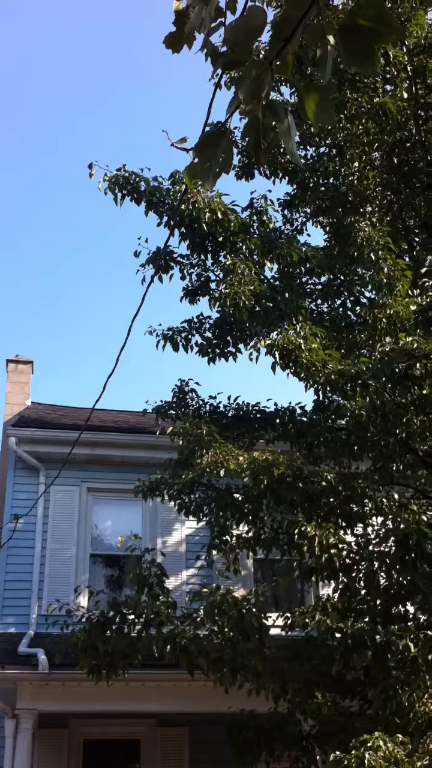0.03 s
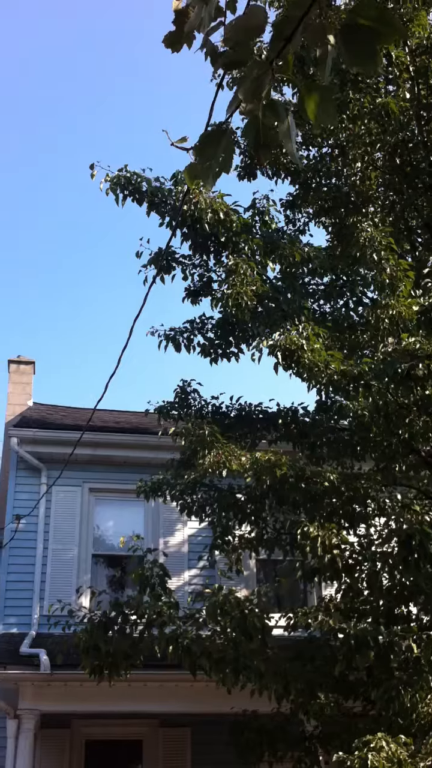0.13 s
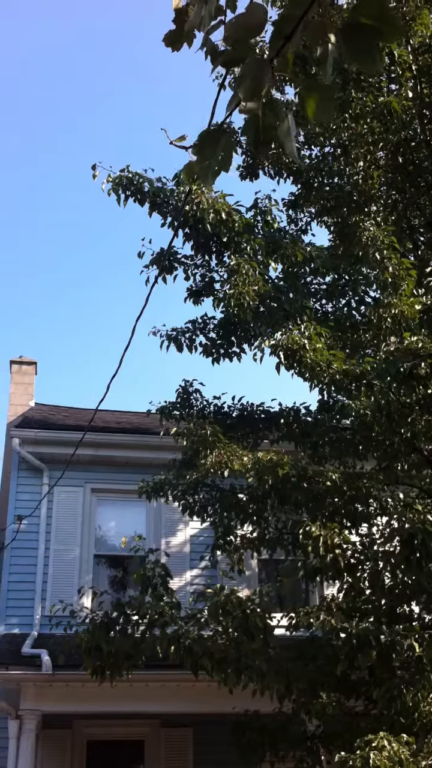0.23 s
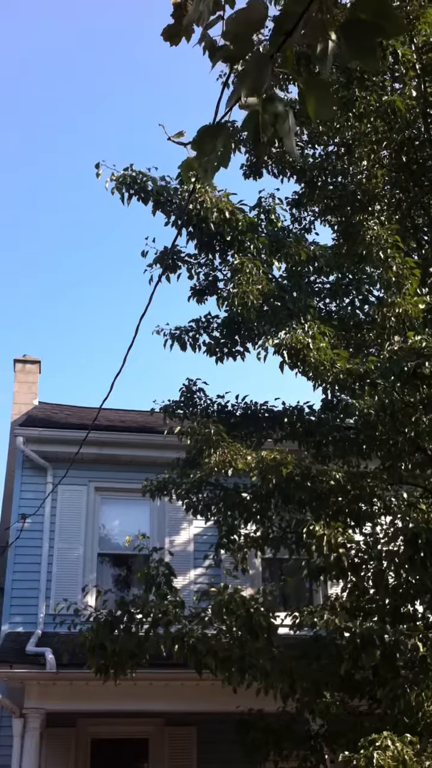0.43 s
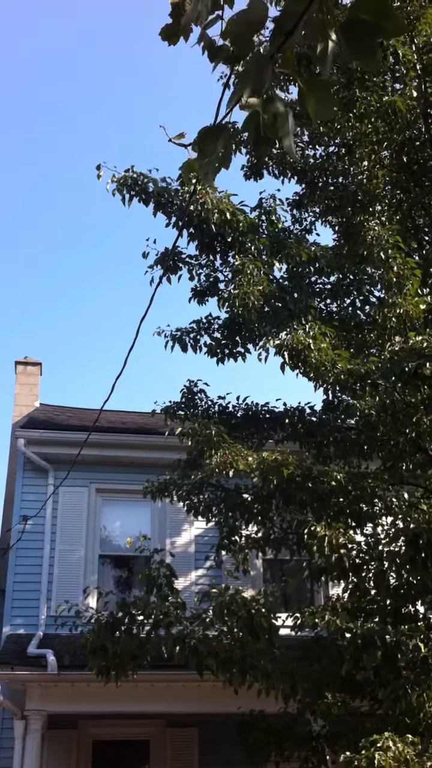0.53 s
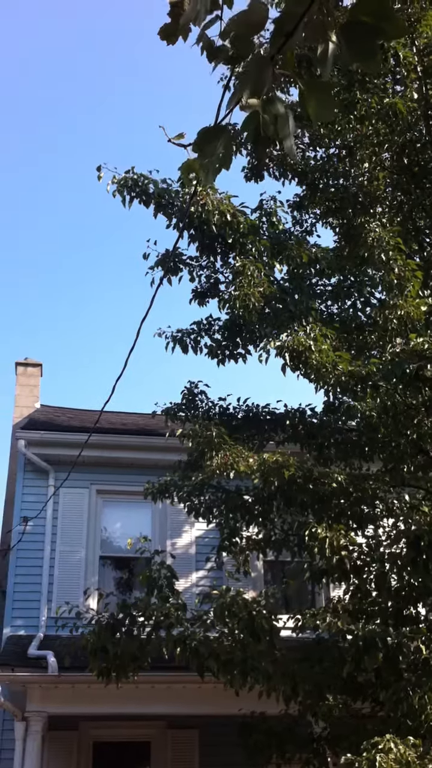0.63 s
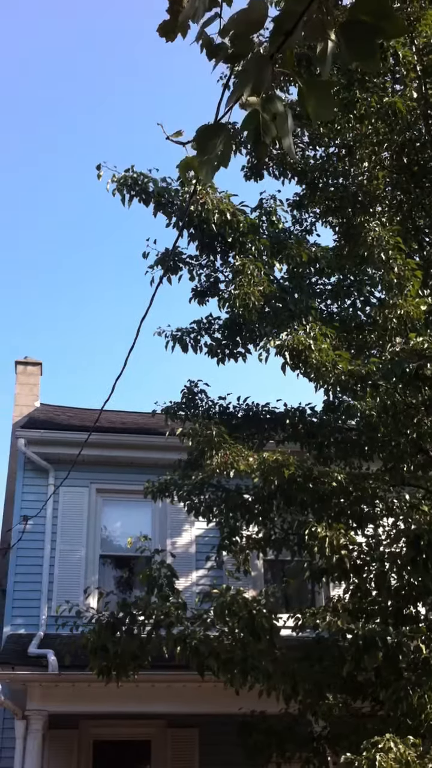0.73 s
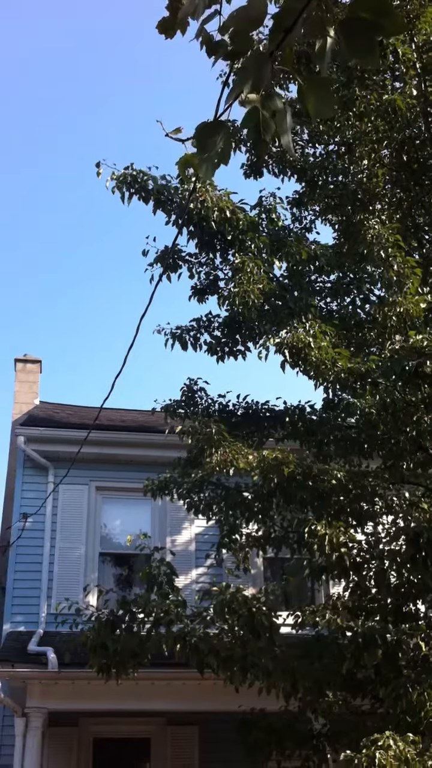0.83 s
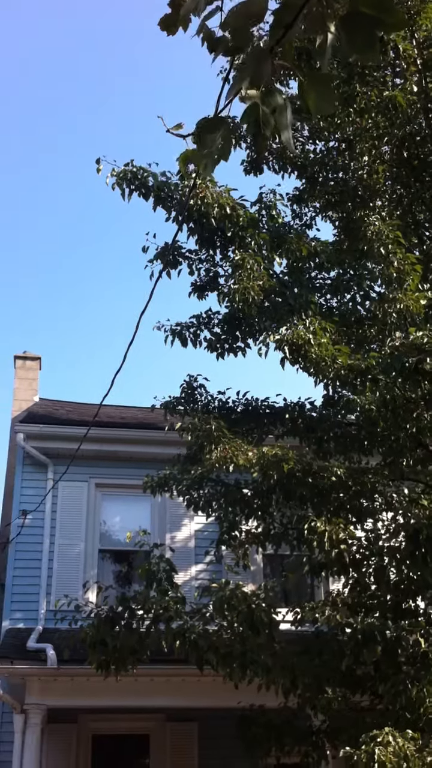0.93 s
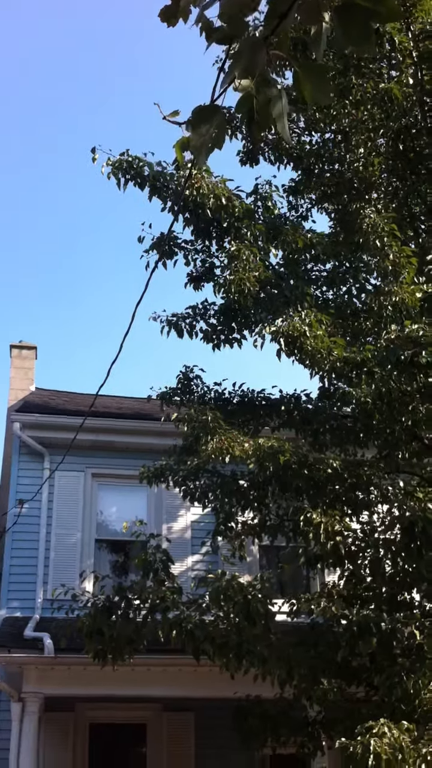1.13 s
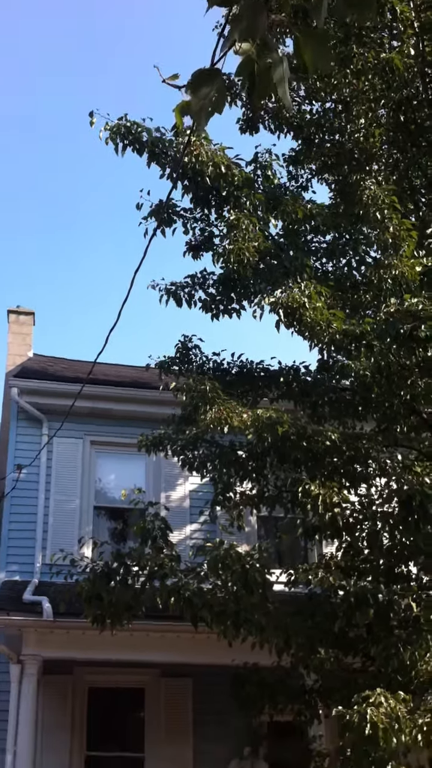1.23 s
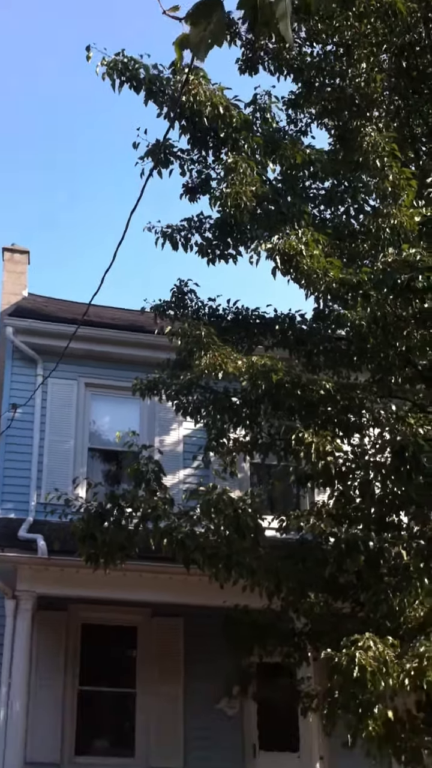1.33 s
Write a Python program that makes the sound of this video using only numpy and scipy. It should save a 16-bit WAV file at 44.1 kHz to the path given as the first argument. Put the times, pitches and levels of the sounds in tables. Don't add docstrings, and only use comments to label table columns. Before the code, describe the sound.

A single acorn knock on a parked car dominates at 0.47 seconds: a hard shell crack, short hollow panel boom, and dense house-front echoes fading over about 0.3 seconds. High crickets, low cooling-unit hum and soft traffic hiss run from 0.08 seconds. Faint leaf ticks come at 0.33, 0.68, 0.99, 1.22 and 1.37; a bird whistles quietly around 0.82-1.08. Breeze gently brightens near 0.7 and 1.2.

```python
import sys
import numpy as np
from scipy import signal
from scipy.io import wavfile

SR = 44100
rng = np.random.default_rng(int(sys.argv[2]) if len(sys.argv) > 2 else 0)


def ratio_of_db(decibels):
    return 10 ** (np.asarray(decibels, float) / 20)


def unload_wav(signal):
    wavfile.write(
        sys.argv[1],
        SR,
        np.round(np.clip(np.atleast_2d(signal).T, -1, 1) * 32767).astype(np.int16),
    )


N = 61739

# (time [s], level [dB])
ACORN_HITS = [
    (.4699, -32),
    (.4717, -30),
]
# (delay [s], level [dB])
WALL_RETURNS = [(.005, -18), (.0105, -15), (.021, -7.5), (.031, 0.5), (.041, -7), (.07, -13), (.105, -10.5)]


def rms_one(x):
    return x / np.sqrt(np.mean(x ** 2) + 1e-20)


def at_hz(points, hz):
    table_hz, values = np.transpose(points)
    return np.interp(np.log(hz), np.log(table_hz), values)


def drift(rate):
    r = np.exp(-80 * np.pi * rate / SR)
    slow = signal.lfilter([1], [1, -2 * r, r * r], rng.standard_normal(N // 40 + 2002))
    slow = rms_one(slow[2000:])
    return np.interp(np.arange(N) / 40, np.arange(len(slow)), slow)


def ring(clicks, hz, t60):
    r = ratio_of_db(-60 / (t60 * SR))
    w = 2 * np.pi * hz / SR
    return signal.lfilter([0, np.sin(w)], [1, -2 * r * np.cos(w), r * r], clicks + 1e-18)


def highpass(x, hz):
    return signal.sosfilt(signal.butter(2, hz, "high", fs=SR, output="sos"), x)


def bands(spectrum):
    edges = 45 * 2 ** np.arange(0, 8.7, 1 / 3)
    centres = np.sqrt(edges[1:] * edges[:-1])
    white = rng.standard_normal((2, N + 8000))
    noise = []
    for k in range(len(centres)):
        band_pass = signal.butter(2, edges[k:k + 2], "band", fs=SR, output="sos")
        noise.append(signal.sosfilt(band_pass, white[k % 2])[8000:])
    noise = np.array(noise) * ratio_of_db(at_hz(spectrum, centres))[:, None]
    return centres, noise / np.std(noise.sum(axis=0))


def ring_modes(push, modes):
    out = np.zeros(N)
    for k, (hz, db, t60) in enumerate(modes):
        out += (-1) ** k * ratio_of_db(db) * ring(push, hz, t60)
    return out


def acorn_shell():
    # (frequency [Hz], level [dB], t60 [s])
    shell_modes = [(2760, 0.1, .02), (2200, -15, .03), (1800, -11, .03), (4950, -12, .01),
                   (6000, -12, .012), (3900, -20, .012), (7700, -22, .01)]
    wall_crack_db, snap_db = -13, -3
    clicks = np.zeros(N)
    for s, db in ACORN_HITS:
        clicks[int(s * SR)] = ratio_of_db(db)
    last_s, last_db = ACORN_HITS[1]
    for delay, db in WALL_RETURNS:
        clicks[int((last_s + delay) * SR)] = ratio_of_db(last_db + wall_crack_db + db)
    return ring_modes(clicks, shell_modes) + ratio_of_db(snap_db) * highpass(clicks, 4000)


def car_panel():
    # (frequency [Hz], level [dB], t60 [s])
    panel_modes = [(173, -10, 0.13), (233.3, -8.5, 0.25), (281, -2.5, 0.078), (395, -2, 0.04),
                   (538, -17, 0.034), (663, -1, 0.13), (810, 3, 0.054), (1094, -1, 0.064),
                   (1300, -25, 0.023)]
    panel_db, lag_s, soft_hz = -37, 0.00254, 1000
    start_s = ACORN_HITS[0][0] + lag_s
    push = np.zeros(N)
    push[int(start_s * SR)] = ratio_of_db(panel_db)
    for k, (delay, db) in enumerate(WALL_RETURNS):
        push[int((start_s + delay) * SR)] = ratio_of_db(panel_db + db) * (-1) ** k
    r = np.exp(-2 * np.pi * soft_hz / SR)
    push = signal.lfilter([(1 - r) ** 2], [1, -2 * r, r * r], push)
    return ring_modes(push, panel_modes)


def echoes():
    # (frequency [Hz], level [dB per Hz])
    scatter = [(100, -14.5), (330, 1), (750, -4), (1400, -13.5), (2000, -5.5), (5200, -11), (9500, -26),
               (14000, -26)]
    # (frequency [Hz], t60 [s])
    scatter_t60 = [(150, 0.29), (700, 0.32), (2500, 0.38), (4000, 0.29), (6000, 0.4), (14000, 0.16)]
    level_db, flicker_db = -39, 1.5
    rise_s, rise_cycles, hold_s = .002, 1.3, .03
    hz, noise = bands(scatter)
    since_hit = np.maximum(np.arange(N) / SR - ACORN_HITS[0][0], 0)
    rise = 1 - np.exp(-since_hit / (rise_s + rise_cycles / hz[:, None]))
    fall_db = -60 * np.maximum(since_hit - hold_s, 0) / at_hz(scatter_t60, hz)[:, None]
    blow = (noise * rise * ratio_of_db(fall_db)).sum(axis=0)
    return ratio_of_db(level_db + flicker_db * drift(134)) * blow


def bird():
    # (time [s], length [s], pitch [Hz], end glide [Hz], level [dB])
    bird_notes = [(.818, .018, 4430, -150, -62), (.858, .026, 4650, -650, -60), (.887, .016, 4640, 10, -70),
                  (.907, .024, 4670, -500, -60), (.961, .021, 4650, -150, -60),
                  (.981, .012, 4150, 400, -65), (.99, .026, 4540, -40, -62), (1.019, .008, 4550, 20, -68),
                  (1.031, .038, 4550, -90, -64), (1.073, .012, 4530, 10, -69)]
    out = np.zeros(N)
    for s, length, hz, glide, db in bird_notes:
        u = np.linspace(0, 1, int(length * SR))
        i = int(s * SR)
        shape = ratio_of_db(db + 2.5 - 5 * u ** 2) * np.sin(np.pi * u) ** .4
        pitch = hz + glide * u ** 3.5
        out[i:i + len(u)] += np.sqrt(2) * shape * np.sin(2 * np.pi * np.cumsum(pitch) / SR)
    return out


def leaf_ticks():
    # (time [s], level [dB])
    ticks = [
        (.329, -60),
        (.679, -57),
        (.986, -56),
        (1.216, -56),
        (1.371, -54),
    ]
    tick_s, low_hz, tick_db = .003, 5000, -9
    t = np.arange(N) / SR
    shape = np.zeros(N)
    for s, db in ticks:
        shape += ratio_of_db(db + tick_db) * np.exp(-((t - s - tick_s) / tick_s) ** 2)
    return shape * highpass(rng.standard_normal(N), low_hz)


def one_cricket(pitch, rate, wander, throb_db):
    pulse_t60_s = 0.018
    t = np.arange(N) / SR
    stroke_count = np.floor(rate * t + wander + .15 * drift(20))
    strokes = 1. * (np.diff(stroke_count, prepend=0) > 0)
    pulses = ring(ring(strokes, pitch, pulse_t60_s), pitch, pulse_t60_s)
    return ratio_of_db(throb_db * drift(19)) * pulses


def crickets():
    # (wing pitch [Hz], spread [Hz], stroke rate [per s], level [dB], throb [dB])
    groups = [
        (6640, 120, 99, -67, 2.0),
        (7080, 160, 70, -66, 2.0),
        (4450, 300, 55, -78, 2.0),
    ]
    # (time [s], first level [dB], second level [dB])
    swell = [(.1, -69, -61), (.19, -74, -65), (.24, -57, -63.5), (.3, -63.5, -64.5), (.41, -75, -61),
             (.44, -63, -63), (.65, -65.5, -66.5), (.85, -61.5, -66), (.9, -66.5, -64), (.97, -73, -66),
             (1.04, -70, -63.5), (1.1, -61, -63), (1.19, -64, -61), (1.28, -71, -70), (1.31, -72.5, -58.5),
             (1.39, -60, -64.5)]
    t = np.arange(N) / SR
    swell_s, *swell_levels = np.transpose(swell)
    out = np.zeros(N)
    for g, (hz, spread, rate, db, throb_db) in enumerate(groups):
        group = np.zeros(N)
        for a, b, c in rng.uniform(-1, 1, (6, 3)):
            group += one_cricket(hz + spread * a, rate * (1 + .1 * b), c, throb_db)
        swell_db = 0
        if g < 2:
            swell_db = np.interp(t, swell_s, swell_levels[g] - np.median(swell_levels[g]))
        out += ratio_of_db(db + swell_db) * rms_one(group)
    return out


def hum():
    # (multiple of the base pitch [ratio], level [dB rms])
    partials = [(1.5, -69), (2, -65), (4, -74), (5, -73), (6, -72), (7, -72), (9, -71), (13, -71)]
    base_hz, hum_db, waver_db = 116.73, -1.85, 0.5
    t = np.arange(N) / SR
    out = np.zeros(N)
    for multiple, db in partials:
        level = np.sqrt(2) * ratio_of_db(db + hum_db + waver_db * drift(5))
        out += level * np.sin(2 * np.pi * (multiple * base_hz * t + rng.random()))
    return out


def street_air():
    # (frequency [Hz], level [dB per Hz])
    air = [(70, -22), (110, -4), (200, -2), (900, -10), (2600, -20), (7000, -23), (7800, -27.5),
           (16000, -33)]
    # (time [s], treble level [dB])
    breeze = [
        (.1, -2.5),
        (.4, -2.5),
        (.7, 2.2),
        (1.0, -0.2),
        (1.2, 3),
        (1.4, 0),
    ]
    air_db, patchy_db, leaves_hz = -55, 2, 7540
    hz, noise = bands(air)
    breeze_db = np.interp(np.arange(N) / SR, *np.transpose(breeze))
    out = np.zeros(N)
    for f, band in zip(hz, noise):
        treble_share = 1 / (1 + (leaves_hz / f) ** 4)
        out += band * ratio_of_db(patchy_db * drift(7.9) + breeze_db * treble_share)
    return ratio_of_db(air_db) * out


def scene():
    acorn = acorn_shell() + car_panel() + echoes()
    background = bird() + leaf_ticks() + crickets() + hum() + street_air()
    mono = acorn + background
    return np.array([mono, mono])


def top_cut(x):
    return signal.sosfilt(signal.butter(12, 16460, fs=SR, output="sos"), x)


def record(dry):
    start_s, open_s, top_hz = 0.083, .001, 15850
    cut = highpass(dry, 60)
    cut = signal.sosfilt(signal.cheby2(16, 55, top_hz + 250, fs=SR, output="sos"), cut)
    opening = np.clip((np.arange(N) / SR - start_s) / open_s, 0, 1)
    return top_cut(cut * opening)


dry = scene()
out = record(dry)
unload_wav(out)
```